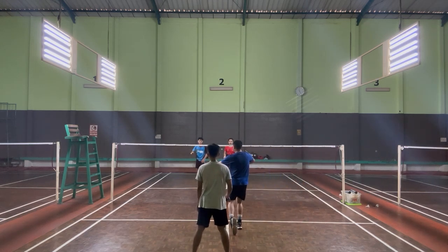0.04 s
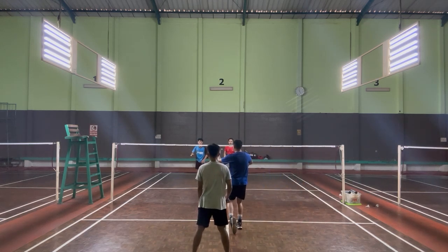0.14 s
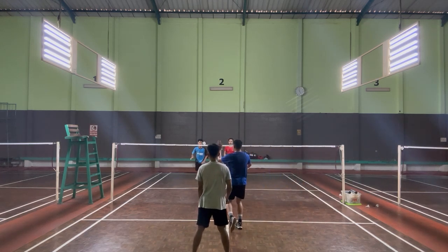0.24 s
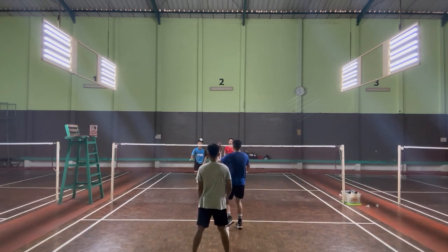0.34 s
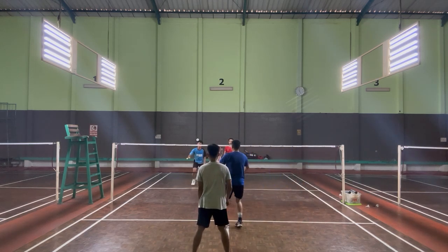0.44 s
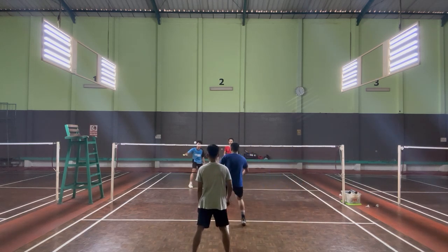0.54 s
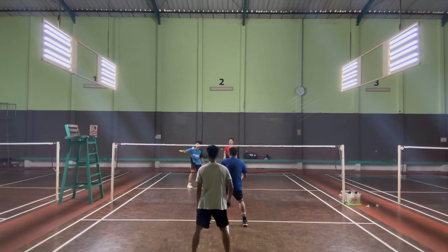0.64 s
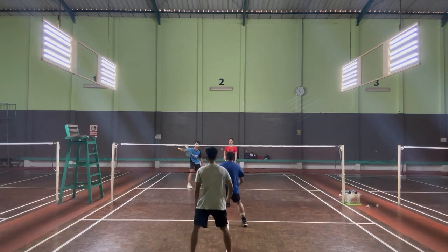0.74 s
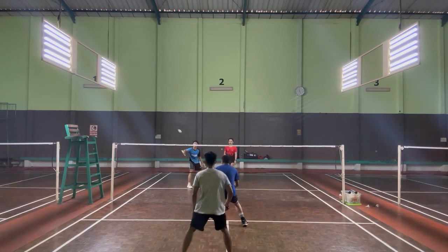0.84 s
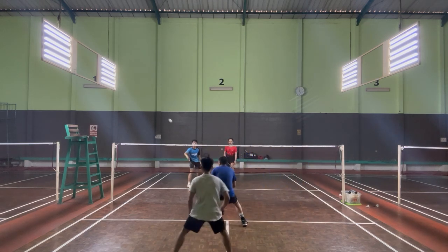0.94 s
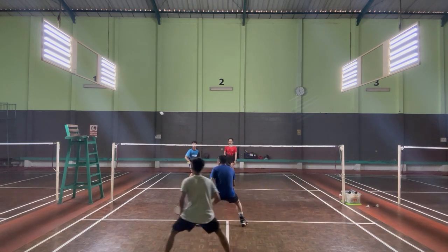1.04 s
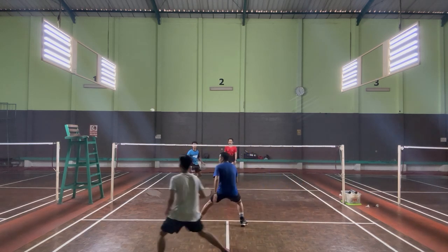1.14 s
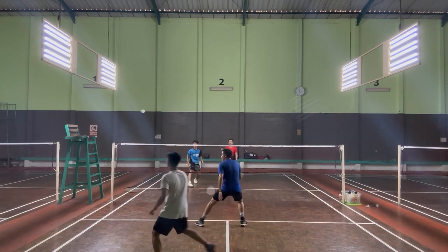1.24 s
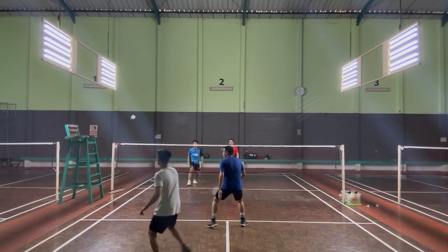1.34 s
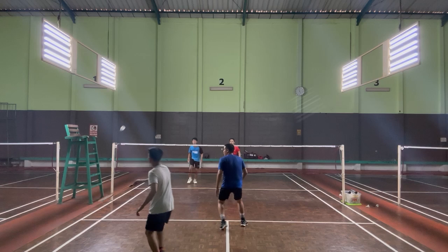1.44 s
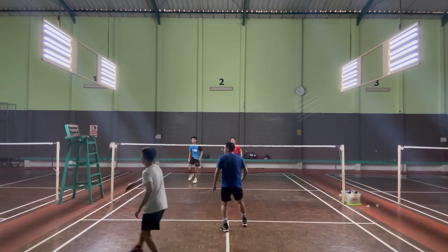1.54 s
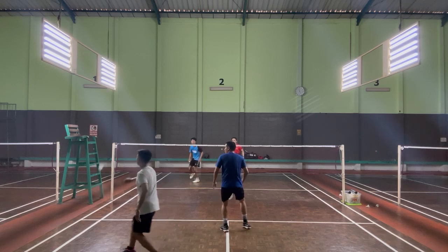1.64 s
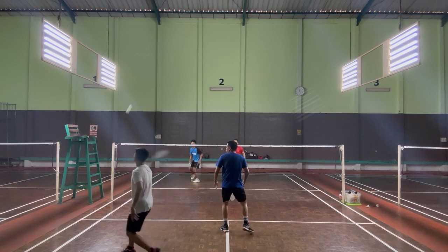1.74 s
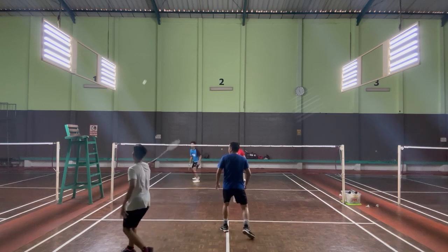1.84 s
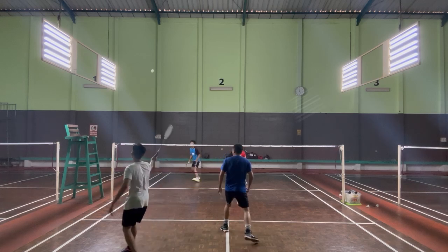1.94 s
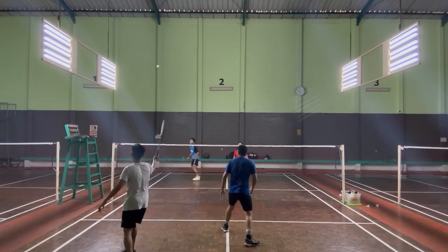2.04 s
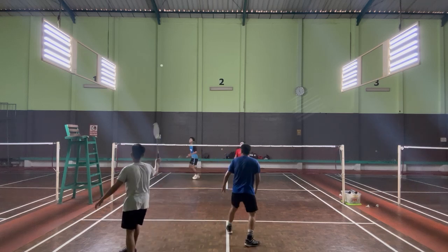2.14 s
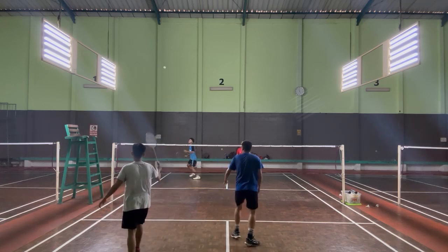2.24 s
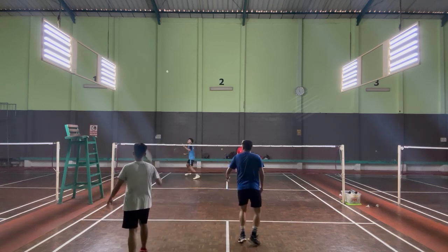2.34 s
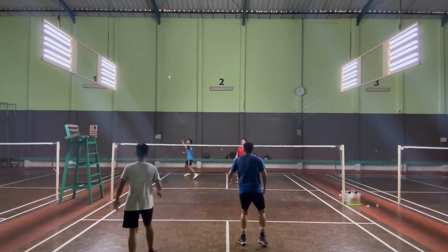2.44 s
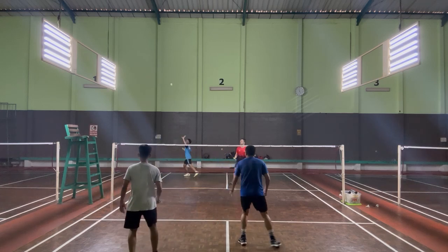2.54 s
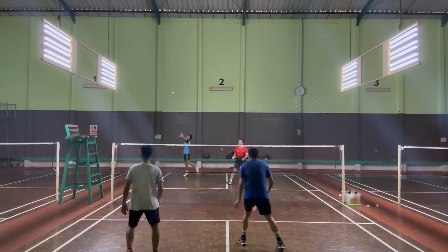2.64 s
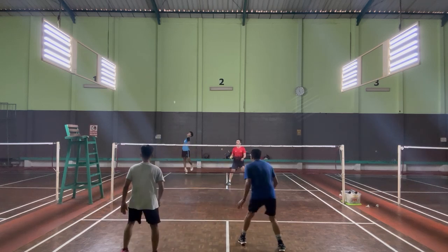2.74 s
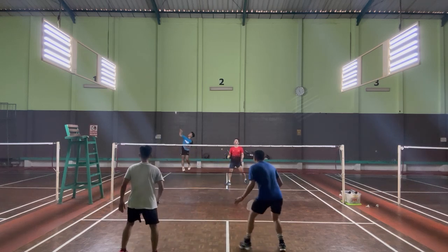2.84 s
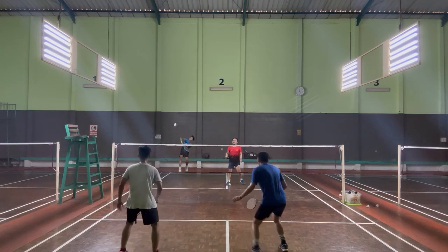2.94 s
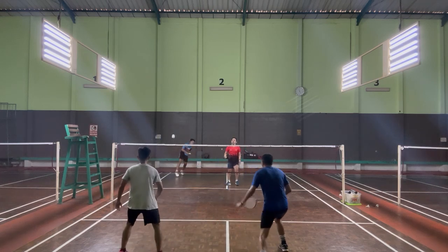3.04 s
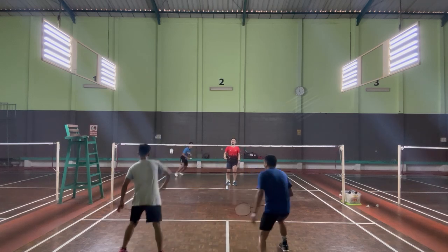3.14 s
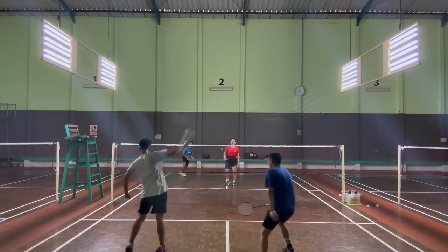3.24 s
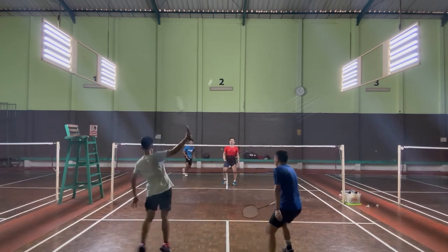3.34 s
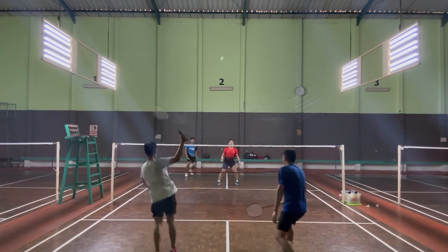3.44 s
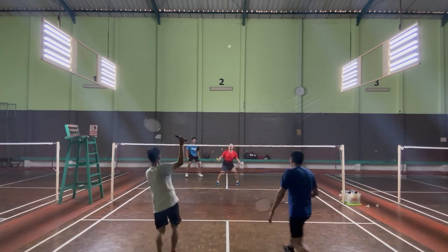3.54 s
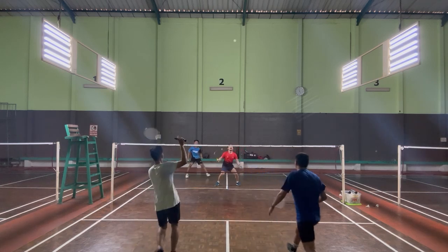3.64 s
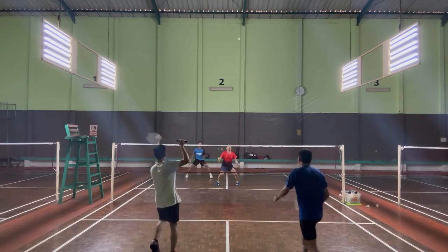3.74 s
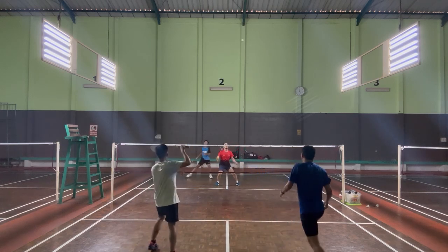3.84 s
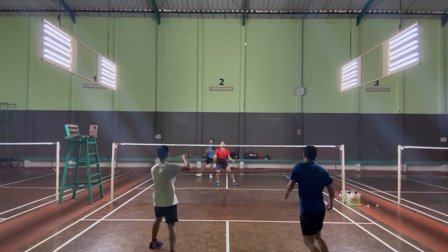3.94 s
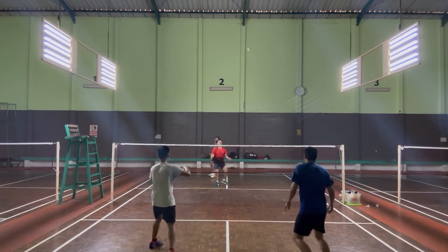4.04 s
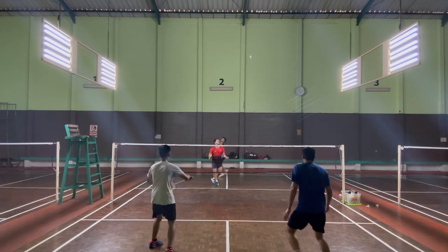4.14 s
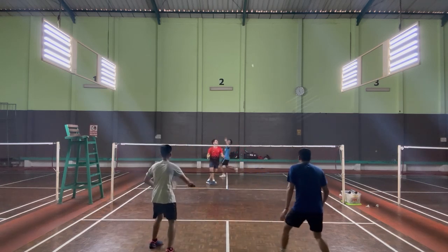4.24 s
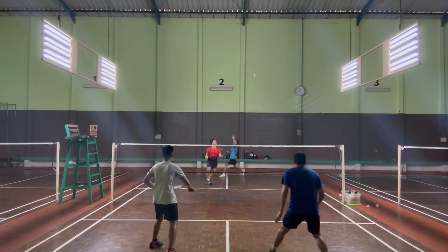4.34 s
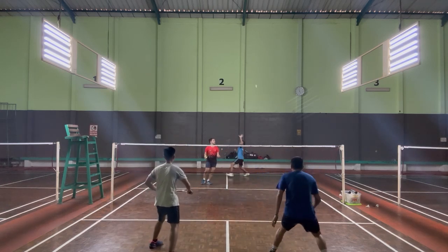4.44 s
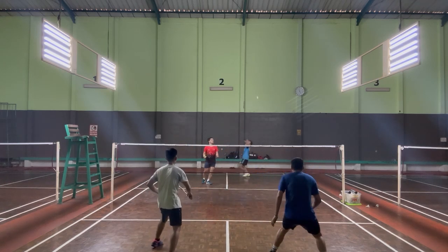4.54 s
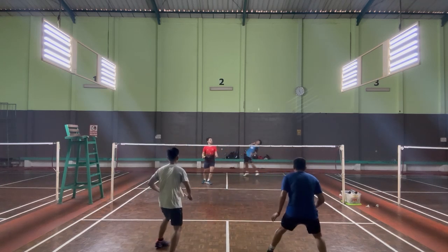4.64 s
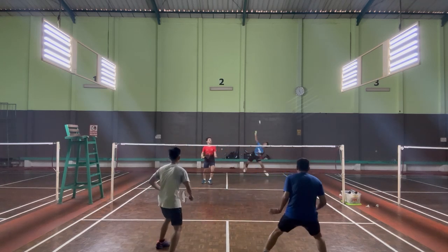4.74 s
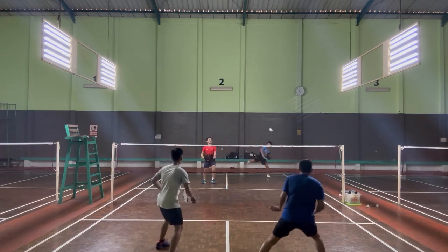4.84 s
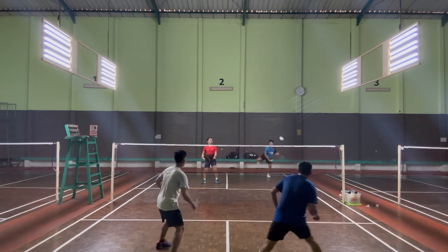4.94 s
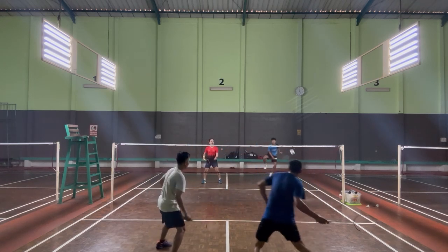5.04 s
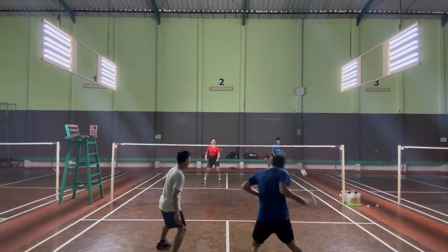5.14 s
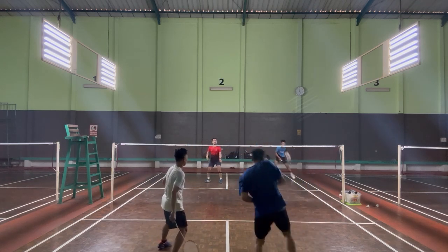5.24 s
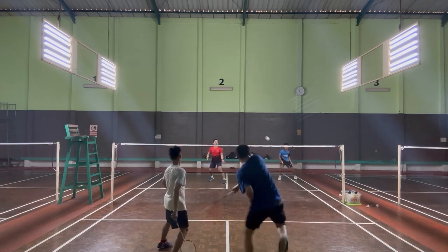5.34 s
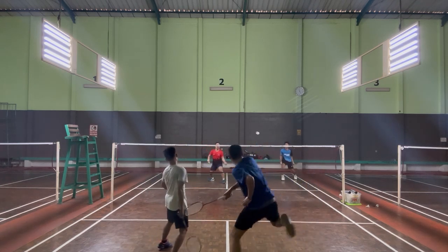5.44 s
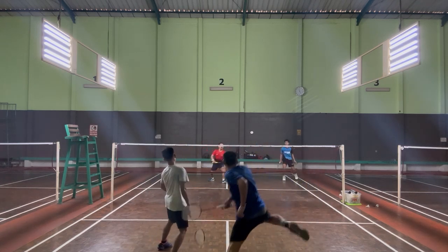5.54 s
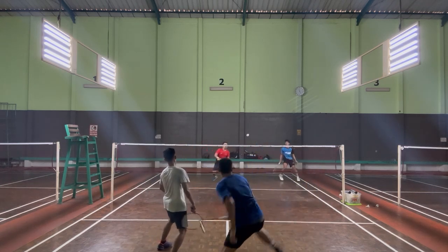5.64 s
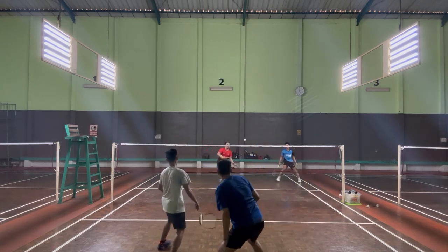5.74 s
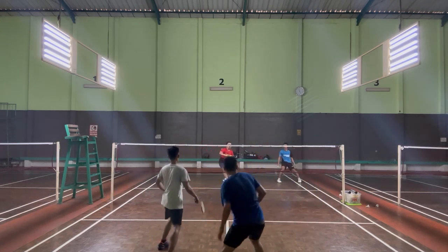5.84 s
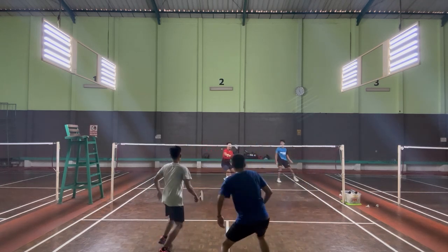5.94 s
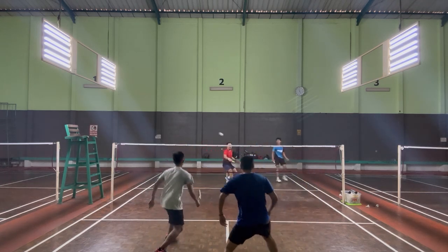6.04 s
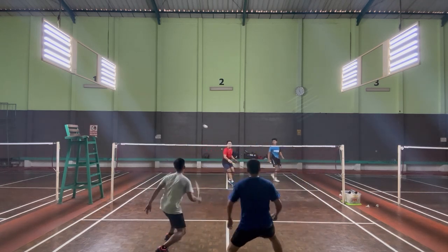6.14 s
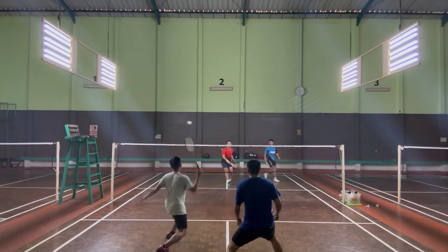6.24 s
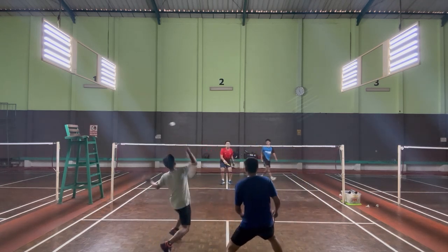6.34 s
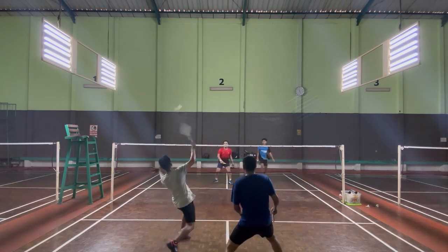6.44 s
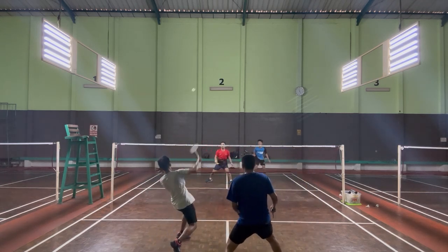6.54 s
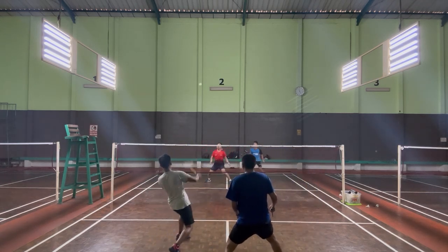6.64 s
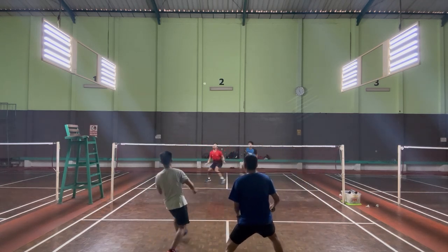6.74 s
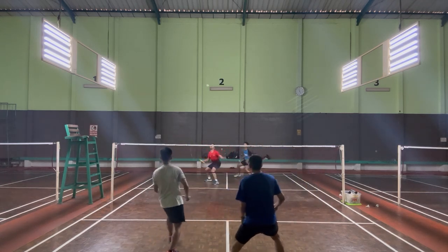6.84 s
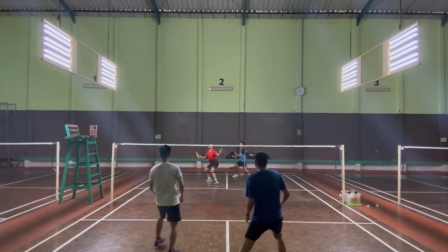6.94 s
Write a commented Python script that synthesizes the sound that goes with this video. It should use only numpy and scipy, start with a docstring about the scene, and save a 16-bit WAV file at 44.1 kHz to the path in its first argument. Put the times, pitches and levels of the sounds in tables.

```python
"""Badminton in a bare hall

A doubles rally in a big, very reverberant sports hall, heard from behind the near baseline.
Rackets: filtered clicks for the cork, decaying sines for the strings, noise for the feathers, an end-wall slap.
Soles: gliding tones squeak, grainy noise scuffs, decaying noise stamps and patters.
Hall: decaying noise bands hang for seconds above a shaped-noise rumble and wavering sine hums."""
import sys
import numpy as np
from scipy import signal
from scipy.fft import rfft, irfft
from scipy.io import wavfile
from scipy.ndimage import uniform_filter1d

SR = 44100
rng = np.random.default_rng(int(sys.argv[2]) if len(sys.argv) > 2 else 0)


def dump(signal):
    """Clip the signal to [-1, 1] and save it as 16-bit WAV at the path in sys.argv[1]."""
    limited = np.clip(np.atleast_2d(signal).T, -1, 1)
    pcm = np.round(limited * 32767).astype(np.int16)
    wavfile.write(sys.argv[1], SR, pcm)


N = 308700

# Racket strokes. Each row: start in seconds, cork knock in dB, knock in Hz, slice from 0 (met flat) to 1 (cut
# across the feathers), feather crack in dB re knock, push of air in Hz, distance in metres, shift to the left
# in dB, end-wall slap in dB, end-wall boom in dB.
STROKES = [ (-0.45, -35.5, 1100, 0, -12, 340, 3.4, 0, 0, 0),
           (0.437, -37, 2920, 0.34, -10.5, 336, 7.5, 0, -17, 0),
           (1.064, -32.5, 1420, 0.44, -23, 427, 5.5, 6.5, -4, 0),
           (1.688, -21, 486, 0.016, -5.5, 411, 5.27, 5.5, 4.5, 4.5),
           (2.934, -11.7, 1150, .62, -9, 340, 13.2, 1.5, 1, 11.5),
           (3.246, -16.5, 2100, 0.79, -10.5, 250, 6.3, 1, -7, -3),
           (4.799, -11.4, 1150, .9, -9.5, 340, 14.1, 0, -2, 2),
           (5.209, -20, 696, 0.89, -8, 322, 3.9, -1.5, -20, 0),
           (5.952, -26.5, 945, 0.17, -10, 414, 6.6, -4, 6, -2),
           (6.426, -16, 517, .85, -6.5, 339, 2.7, 1.5, -2, 0)]
# String bed modes. Each row: frequency at rest in Hz, level in dB, 60 dB decay time in seconds.
STRING_MODES = [(462, 1, 0.063), (687, 9, 0.019), (1114, 19, 0.052), (1660, 17, 0.035), (1750, 11, 0.043),
                (2310, -1, 0.055)]
# Squeaking slides. Each row: start in seconds, length in seconds, start pitch in Hz, end pitch in Hz, level in
# dB, step to each overtone in dB, roughness from 0 to 1, reach into the hall, written as metres (larger means
# more reverberation and a sooner end-wall echo), shift to the left in dB.
SQUEAKS = [ (-0.30, .03, 4700, 4800, -34.5, -5, .3, 6.5, 0),
           (0.581, .012, 4140, 4250, -24.5, -6, 0.25, 8.6, 2),
           (0.698, .014, 4460, 5100, -32, -16, 0.4, 5, 5.5), (0.751, .013, 4780, 5000, -41, -16, 0.3, 7, 4),
           (1.609, .007, 3950, 3780, -26, -11, 0.25, 11, 0),
           (1.613, 0.012, 3543, 3470, -22.5, -14, 0.22, 9, 1),
           (1.646, 0.011, 2863, 2935, -27, -11, 0.33, 16, -1),
           (1.654, 0.011, 2970, 3210, -26, -12, 0.35, 11, 1),
           (1.855, 0.013, 3160, 3020, -31, -6, 0.5, 14, 2),
           (1.981, 0.017, 3140, 3400, -29, -18, 0.3, 5.2, -3),
           (4.195, 0.010, 3040, 2990, -24.5, -17, 0.3, 13, 1),
           (4.218, 0.019, 2900, 3100, -21.5, -16, 0.35, 10.5, 2),
           (4.238, 0.011, 2860, 2950, -25, -4, 0.4, 11, 4.5),
           (4.245, 0.020, 2950, 3090, -19, -9.5, 0.42, 12, 1),
           (4.254, 0.022, 3200, 3480, -24.5, -19, 0.5, 12.5, 1),
           (5.998, 0.011, 4530, 4300, -20.5, -17, 0.4, 5.5, 2),
           (6.067, 0.011, 3260, 3480, -11, -13, .8, 4.8, 1.5),
           (6.074, 0.015, 3570, 3900, -15, -19, 0.8, 7.2, 1.5),
           (6.08, 0.014, 2920, 3080, -23.5, 0, 0.75, 11, 1.5),
           (6.431, 0.017, 3190, 3300, -17, -5.5, .65, 8.3, 4),
           (6.438, .009, 3860, 3550, -16.5, -12, .95, 5, 0),
           (6.819, 0.0128, 3886, 3620, -21.5, -8.5, 0.4, 13.5, 3.5),
           (6.831, 0.007, 3630, 3220, -16, -13.5, 0.54, 8.2, 0.5),
           (6.855, 0.023, 2650, 2420, -19, -9, 0.8, 7.5, 0), (6.902, 0.02, 2750, 2500, -25, -3, 0.9, 7, 0),
           (6.926, 0.025, 2520, 2380, -23, -16, 0.8, 7, 0)]
# Soles brushing the floor. Each row: middle in seconds, length in seconds, centre in Hz, level in dB,
# Q of each of two resonances.
SCUFFS = [(0.08, .012, 7500, -54, 1.1), (0.572, 0.042, 10400, -39, 0.69), (0.575, .04, 3900, -34, 0.93),
          (0.701, 0.052, 5500, -35, 0.67), (0.846, 0.038, 2900, -32, 1.15), (1.209, 0.015, 11150, -50, .84),
          (1.309, 0.094, 3760, -28.5, 1.1), (1.382, 0.04, 8200, -35.5, .84),
          (1.418, 0.064, 1750, -30, 0.82), (1.438, .024, 2100, -23.3, 1.45),
          (1.517, .024, 3600, -32.5, 1.4), (2.337, 0.079, 5400, -31.5, 0.66),
          (2.343, 0.045, 3000, -25.5, 1.44), (2.793, 0.04, 2440, -28.5, 0.61),
          (4.671, 0.038, 4450, -39, 0.63), (5.589, 0.011, 3420, -28, 2.2), (5.7, 0.032, 10700, -41, 0.48),
          (6.869, 0.044, 2870, -19, 0.83), (6.909, 0.077, 5700, -25.5, 1.8)]
# Hard landings. Each row: start in seconds, sole slap in dB, slap in Hz, floor thud in dB.
LANDINGS = [ (0.151, -50, 300, -28.5), (0.688, -36, 815, -31), (1.382, -37, 696, -31.5),
            (1.43, -32, 900, -32.5), (1.51, -30.5, 3000, -41), (2.193, -31, 2200, -44),
            (3.25, -34, 300, -24.5), (5.521, -21.5, 2100, -32), (5.697, -22, 950, -29),
            (5.952, -25, 900, -33), (5.984, -27, 3270, -41)]
# Reverberation. Each row: frequency in Hz, echo colour in dB, 60 dB decay time in seconds.
HALL_BANDS = [(68.6, 0.5, 5.6), (114, 2.5, 2.5), (166.5, 9, 5.3), (251, 0, 7.4), (307, 3.5, 3.1),
              (480, 6, 6.2), (766, 5.5, 6.3), (973, 5, 8), (1265, 1, 5.9), (1680, 0.5, 7.7), (3250, 0, 5.4),
              (5600, -0.5, 4), (10400, 5.5, 1.18), (16200, 7, 0.63)]
# Diffuse sound. Each row: frequency in Hz, left-right correlation from -1 to 1.
PORT_CORRELATION = [(60, 0.9), (125, 0.84), (250, 0.8), (500, -0.0072), (1000, -0.12), (4000, 0.076),
                    (10000, -0.25)]
# Rumble spectrum. Each row: frequency in Hz, relative density in dB per Hz.
RUMBLE_SPECTRUM = [(20, -55), (32, -16), (46, -8), (70, -7), (110, -1.5), (165, -8), (320, -7.5), (470, -9),
                   (750, -15), (1400, -20.5), (3000, -25.5), (6000, -38), (13000, -42.5), (16000, -62)]
# Rumble level. Each row: time in seconds, level in dB.
RUMBLE_LEVEL = [(0, -37), (1.2, -37), (2.701, -37.5), (4.5, -37), (5.801, -37), (7, -30.5)]
# Overall colour of the sound. Each row: frequency in Hz, gain in dB.
TONE_COLOUR = [(22, -15), (45, 3), (4000, -6.5), (8200, -9.5), (8800, -18.5), (9500, -35), (10700, -4.5),
               (13000, -3.5), (14500, -3.5), (15700, -39)]
# Hard, flat surfaces near the end wall. Each row: delay after the slap begins in seconds, level in dB.
BRIGHT_ECHOES = [(.003, -9), (.009, -17), (.017, -5), (0.031, -11)]
# Port imbalance. Each row: frequency in Hz, raise of the left port and cut of the right in dB.
PORT_IMBALANCE = [(100, 1.34), (500, 0.3), (4000, 1.86), (8000, 0.2)]
# End-wall boom. Each row: resonance in Hz, level in dB.
WALL_PANELS = [(330, -2), (1000, 5)]
# Hums that swell and sink. Each row: middle in seconds, length in seconds, pitch in Hz, level in dB.
HUMS = [(0.6, 1.8, 68, -44), (1.5, 2, 99, -42), (2.15, 1.2, 117, -43), (3.95, 1, 102, -42),
        (4.5, 1.8, 71, -47), (5.75, .9, 71, -38), (6.4, 1.2, 72, -42), (6.2, 2, 50, -44),
        (5.5, 1.1, 173, -39), (6.05, .7, 183, -40), (6.85, 1, 113, -41)]
# Late changes in the wash's level: chiefly a brief swell at about 0.1 s. Each row: delay in seconds, spread in
# seconds, level in dB.
LATE_CHANGES = [(0.074, 0.0042, -0.5), (0.107, 0.004, 3), (.19, .015, 0)]

LEAD = SR // 2  # samples rendered ahead of time zero
TOTAL = N + LEAD
HALL_RADIUS_M = 4.49  # a sound from here feeds the hall at its own level, one from further off feeds it more
END_WALL_M, SOUND_M_PER_S = 17, 343
RING_DB, SLICE_MUTES_DB = 6.5, 26  # string ring re knock when met flat; what a full slice takes from it
THUMP_DB = -5  # push of air re knock at the hall radius; it fades faster with distance
CATCH_S, CATCH_SCATTER = .0125, 0.045  # nominal spacing of a sole's catches; relative pitch scatter when fully rough
SWELL_DB_PER_S = 97  # a squeak grows as the weight comes onto the foot
SOLE_TOP_HZ = 8500  # rubber damps the overtones above this
HUM_WAVER_HZ, HUM_WAVER_DB = 1.97, 1.5  # deviation of the random knots
CUTOFF_HZ = 16400


def from_db(db):
    """Decibels to gain."""
    return 10 ** (np.asarray(db) / 20)


def at_hz(points, hz, axis=1):
    """Reads one column of a table on a log-frequency axis."""
    points = np.array(points)
    return np.interp(np.log(np.maximum(hz, 1)), np.log(points[:, 0]), points[:, axis])


def seconds(length_s):
    """Time axis of a short sound."""
    return np.arange(int(length_s * SR)) / SR


def impulse(t):
    """A single-sample click."""
    return (t == 0) * 1.


def burst(x, db):
    """Gives a short sound the energy of 10 ms at this level."""
    rms_over_10_ms = np.sqrt(np.sum(x ** 2) / (SR / 100) + 1e-20)
    return from_db(db) * x / rms_over_10_ms


def resonate(x, hz, q):
    """A two-pole resonance with unit gain at its peak."""
    w = 2 * np.pi * min(hz, SR / 3) / SR
    damp = np.sin(w) / (2 * q)
    return signal.lfilter([damp, 0, -damp], [1 + damp, -2 * np.cos(w), 1 - damp], x)


def resonate_twice(x, hz, q):
    """Two equal resonances in series: steeper skirts."""
    return resonate(resonate(x, hz, q), hz, q)


def soften(x, hz):
    """A yielding contact rounds off the sharpest edges: second-order lowpass."""
    return signal.sosfilt(signal.butter(2, min(hz, SR / 3), fs=SR, output="sos"), x)


def pan(x, left_db):
    """Places a sound to the left or right by level."""
    return x * from_db([[left_db], [-left_db]])


def tracks():
    """Empty tracks: the stereo direct sound, and the mono send to the hall."""
    return np.zeros((2, TOTAL)), np.zeros(TOTAL)


def add(track, s, x):
    """Mixes a sound into a track that starts LEAD samples before time zero."""
    i = max(LEAD + int(round(s * SR)), 0)
    track[..., i:i + x.shape[-1]] += x[..., :max(TOTAL - i, 0)]


def diffuse(size):
    """Frequencies and spectrum of noise arriving from all sides at two spaced ports."""
    hz = np.fft.rfftfreq(size, 1 / SR)
    mid, side = rfft(rng.standard_normal((2, size)))
    alike = np.clip(at_hz(PORT_CORRELATION, hz), -1, 1)
    common = np.sqrt((1 + alike) / 2) * mid
    opposed = np.sqrt((1 - alike) / 2) * side
    return hz, common + opposed * np.array([[1], [-1]])


def strings(t, doppler):
    """The string bed rings briefly as decaying modes, shifted in pitch by the swing."""
    return sum(from_db(db - 60 * t / t60_s) * np.sin(2 * np.pi * hz * doppler * t)
               for hz, db, t60_s in STRING_MODES)


def flex(x):
    """The strings yield for a few milliseconds: allpasses draw the knock out without changing its colour."""
    for hz in (700, 1400, 2800):
        x = x - 2 * resonate(x, hz, 2.1)
    return x


def end_wall(x, boom_db):
    """Wall, floor and roof beams return a dense cluster with a mid-range boom and a few sharp echoes."""
    spread_s, panel_q, dull_hz, sharp_hz = .0095, 4, 1700, 3500
    t = seconds(.12)
    _, field = diffuse(len(t))
    cluster = irfft(field, len(t)) * np.exp(-t / spread_s) * np.sqrt(t)
    cluster = cluster / np.sqrt(np.sum(cluster ** 2) / 2)
    boom = sum(from_db(db) * resonate_twice(x, hz, panel_q / 2) for hz, db in WALL_PANELS)
    excitation = soften(x, dull_hz) + from_db(boom_db) * boom
    slap = signal.fftconvolve(excitation[None], cluster, axes=1)
    for lag_s, db in BRIGHT_ECHOES:
        i = int(np.clip(lag_s, 0, t[-1]) * SR)
        slap[:, i:i + len(x)] += from_db(db) * flex(resonate(x, sharp_hz, 0.12))
    return slap


def wall_echo(x, metres, boom_db=0):
    """Delay and sound of the end-wall slap: the further up the court, the sooner and stronger it follows."""
    path_m = metres + 2 * max(END_WALL_M - metres, 0)
    return (path_m - metres) / SOUND_M_PER_S, metres / path_m * end_wall(x, boom_db)


def rackets(knock_q=0.46, cork_hz=3800, thump_s=0.0014, crack_s=0.0032, crack_hz=6500, crack_q=1.0,
            swing_mach=0.028, ring_hall_db=-3.0, bounce_s=0.003465, bounce_gain=0.43):
    """The cork knocks, the string bed pushes air and rings, the feathers crack; a slice mutes the ring."""
    direct, send = tracks()
    t = seconds(.15)
    click = impulse(t)
    for s, db, knock_hz, sliced, feather_db, thump_hz, metres, left_db, wall_db, boom_db in STROKES:
        far = metres / HALL_RADIUS_M
        ring_db = db + RING_DB - SLICE_MUTES_DB * sliced
        crack_db = db + feather_db
        knock = burst(resonate(soften(click, cork_hz), knock_hz, knock_q), db)
        push = t * np.exp(-t / thump_s) * np.cos(2 * np.pi * thump_hz * t)
        thump = burst(push, db + THUMP_DB) / far
        flurry = rng.standard_normal(len(t)) * np.sqrt(t) * np.exp(-t / crack_s)
        feathers = burst(resonate(flurry, crack_hz, crack_q), crack_db)
        # summed over all directions the crack has a smooth spectrum
        radiated = knock + thump - burst(resonate(click, crack_hz, crack_q), crack_db)
        # the racket swings away from the listener: its ring is flat here and sharp towards the hall
        ring_here = burst(strings(t, 1 - swing_mach), ring_db)
        ring_away = burst(strings(t, 1 + swing_mach), ring_db + ring_hall_db)
        impact = flex(knock) + thump
        add(direct, s, pan(0.75 * (impact + ring_here), left_db))
        add(direct, s - .001, feathers)
        # floor reflection, later when near
        add(direct, s + bounce_s / np.sqrt(far), pan(bounce_gain * impact, left_db))
        outgoing = radiated + ring_away
        delay_s, slap = wall_echo(outgoing, metres, boom_db)
        add(direct, s + delay_s, from_db(wall_db) * slap)
        add(send, s, far * outgoing)
    return direct, send


def hall(send, early_gain=0.13, early_s=1.0, level_db=-43.0):
    """Echoes arrive in clumps after a short gap, merge into a smooth wash and die band by band."""
    gap_s, build_s = .006, .013
    clump_s, clump_db, merge_s = .005, 2.5, .4
    t = seconds(5)
    hz, field = diffuse(len(t))
    centres_hz = np.geomspace(70, 16000, 13)
    tail = 0
    for centre_hz, pick in zip(centres_hz, np.eye(len(centres_hz))):
        # overlapping bands that sum to one
        share = at_hz(np.column_stack([centres_hz, pick]), hz) * from_db(at_hz(HALL_BANDS, hz))
        t60_s = at_hz(HALL_BANDS, centre_hz, axis=2)
        tail = tail + irfft(field * share, len(t)) * from_db(-60 * t / t60_s)
    build_up = 1 - np.exp(-np.maximum(t - gap_s, 0) / build_s)
    early = 1 + early_gain * np.exp(-t / early_s)
    late_db = sum(db * np.exp(-.5 * ((t - delay_s) / spread_s) ** 2)
                  for delay_s, spread_s, db in LATE_CHANGES)
    arrivals_s = np.arange(0, t[-1], clump_s)
    uneven = np.interp(t, arrivals_s, rng.standard_normal(len(arrivals_s)))
    clumps = from_db(clump_db * uneven * np.exp(-t / merge_s))
    response = tail * build_up * early * from_db(late_db) * clumps
    return from_db(level_db) * signal.fftconvolve(send[None], response, axes=1)[:, :TOTAL]


def squeaks(wobble=0.068, flutter=0.52, rasp_db=-10, rasp_q=0.64, tread_width=0.094, glide_share=1.0, echo_db=3):
    """Rubber sticks and slips thousands of times a second: a gliding, stuttering tone with overtones."""
    direct, send = tracks()
    t = seconds(.1)
    for s, length_s, start_hz, end_hz, db, step_db, rough, reach_m, left_db in SQUEAKS:
        hall_share = reach_m / HALL_RADIUS_M
        rough = np.clip(rough, 0, 1)
        u = np.minimum(t / length_s, 1)  # progress of the slide
        catches = max(round(length_s / CATCH_S), 1)
        # smoothed noise of about unit deviation
        grip, load = uniform_filter1d(rng.standard_normal((2, len(t))), size=49) * 7
        offsets = rng.standard_normal(size=16)[(u * catches).astype(int)]
        unsteady = rough * (wobble * grip + CATCH_SCATTER * offsets)
        glide_hz = start_hz + (end_hz - start_hz) * u
        pitch_hz = glide_hz * (1 + unsteady - unsteady[u < 1].mean())
        phase = 2 * np.pi * np.cumsum(pitch_hz) / SR
        overtones = [(k, from_db(step_db * (k - 1)) / np.sqrt(1 + (k * end_hz / SOLE_TOP_HZ) ** 12))
                     for k in (1, 2, 3)]
        tone = sum(gain * np.sin(k * phase) for k, gain in overtones)
        scrape = resonate(rng.standard_normal(len(t)), end_hz, rasp_q)
        rasp = rough * from_db(rasp_db) * soften(scrape, SOLE_TOP_HZ)
        stutter = np.abs(np.sin(np.pi * catches * u)) ** 0.47 * from_db(SWELL_DB_PER_S * t)
        chirp = burst((tone + rasp) * np.exp(flutter * rough * load) * stutter, db)
        # on a rough slide each rib of the tread has its own pitch: the hall gathers them into a band
        centre_hz = (start_hz + end_hz) / 2
        width_hz = tread_width * centre_hz + glide_share * abs(end_hz - start_hz)
        edges_hz = centre_hz + width_hz * np.array([-.5, .5])
        ribs = 0
        for k, gain in overtones:
            bandpass = signal.butter(2, k * edges_hz, "band", fs=SR, output="sos")
            ribs = ribs + gain * signal.sosfilt(bandpass, impulse(t))
        band = burst(ribs, db)
        add(direct, s, pan(chirp, left_db))
        delay_s, echo = wall_echo(chirp, reach_m)
        add(direct, s + delay_s, from_db(echo_db) * echo)
        add(send, s, hall_share * (np.sqrt(1 - rough ** 2) * chirp + rough * band))
    return direct, send


def rumble():
    """The building's low noise, steady until it rises near the end."""
    hz, field = diffuse(N)
    noise = irfft(field * from_db(at_hz(RUMBLE_SPECTRUM, hz)), N)
    level_db = np.interp(np.arange(N) / SR, *np.transpose(RUMBLE_LEVEL))
    return noise / np.std(noise) * from_db(level_db)


def hums():
    """Narrow low tones come and go in the building, wavering in pitch and level."""
    t, out = np.arange(N) / SR, 0
    knots_s = np.arange(0, 8, .2)
    for s, length_s, hz, db in HUMS:
        stray, flicker = (np.interp(t, knots_s, row) for row in rng.standard_normal((2, len(knots_s))))
        swell = np.cos(np.pi * np.clip((t - s) / length_s, -.5, .5))
        phase = 2 * np.pi * np.cumsum(hz + HUM_WAVER_HZ * stray) / SR
        out = out + from_db(db + HUM_WAVER_DB * flicker) * swell * np.sin(phase)
    return np.sqrt(2) * out  # table levels are RMS


def scuffs(grain_db=5, hall_db=5.0):
    """A sliding sole that does not sing gives a short grainy rub."""
    direct, send = tracks()
    for s, length_s, hz, db, rub_q in SCUFFS:
        u = seconds(length_s) / length_s
        grains = rng.standard_normal(len(u)) * from_db(grain_db * rng.standard_normal(len(u)))
        rub = burst(resonate_twice(grains * np.sin(np.pi * u) ** 2, hz, rub_q), db)
        add(direct, s - length_s / 2, rub)
        add(send, s - length_s / 2, from_db(hall_db) * rub)
    return direct, send


def steps(thud_hz=75, thud_s=0.02, slap_s=.0013, rubber_hz=8000):
    """A landing foot slaps the court and thuds through the floor: two decaying noises."""
    direct, send = tracks()
    t = seconds(.15)
    for s, slap_db, slap_hz, thud_db in LANDINGS:
        weight, sole = rng.standard_normal((2, len(t)))
        thud = resonate_twice(weight * np.exp(-t / thud_s), thud_hz, 0.81)
        slap = soften(resonate(sole * np.exp(-t / slap_s), slap_hz, 1), rubber_hz)
        step = burst(thud, thud_db) + burst(slap, slap_db)
        add(direct, s, step)
        add(send, s, step)
    return direct, send


def footwork(per_s=9, level_db=-36, spread_db=3, patter_hz=290, patter_s=0.0089):
    """Light steps patter from about 0.6 s on: short resonant noises, uneven in time and level."""
    direct, send = tracks()
    t = seconds(.06)
    for k in range(70):
        late, size = rng.standard_normal(2)
        pat = resonate_twice(rng.standard_normal(len(t)) * np.exp(-t / patter_s), patter_hz, 0.53)
        pat = burst(pat, level_db + spread_db * size)
        s = .6 + (k + .3 * late) / per_s
        add(direct, s, 0.84 * pat)
        add(send, s, pat)
    return direct, send


def scene():
    """Players on the court, the hall's answer, the rumble and its hums."""
    direct, send = tracks()
    for source in (rackets, squeaks, scuffs, steps, footwork):
        source_direct, source_send = source()
        direct, send = direct + source_direct, send + source_send
    return (direct + hall(send))[:, LEAD:] + rumble() + hums()


def record(dry):
    """An overall colour shapes both ports, the left more sensitive; peaks are rounded and the top is cut."""
    hz = np.fft.rfftfreq(2 * N, 1 / SR)
    ports_db = at_hz(TONE_COLOUR, hz) + at_hz(PORT_IMBALANCE, hz) * np.array([[1], [-1]])
    coloured = irfft(rfft(dry, 2 * N) * from_db(ports_db))[:, :N]
    rounded = coloured / (1 + (coloured / .9) ** 4) ** .25
    return signal.sosfilt(signal.ellip(10, .2, 80, CUTOFF_HZ, fs=SR, output="sos"), rounded)


dry = scene()
out = record(dry)
dump(out)
```